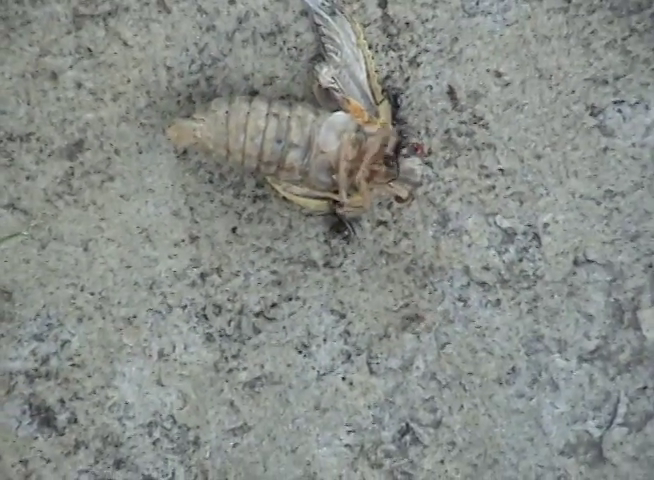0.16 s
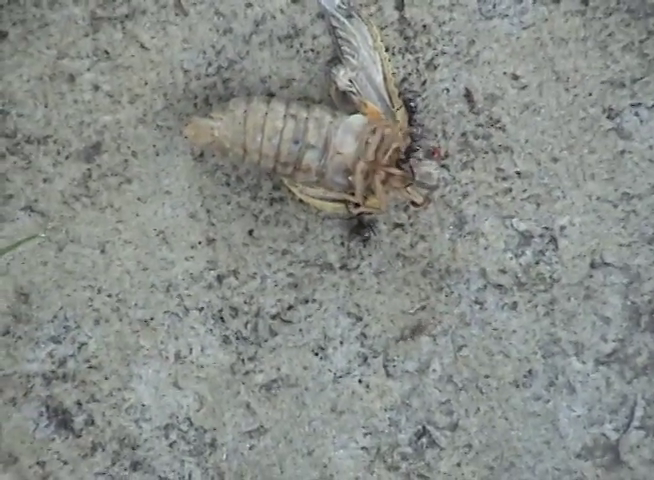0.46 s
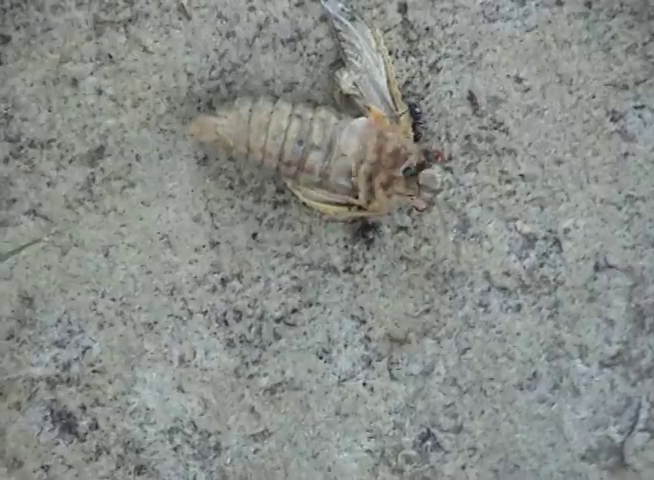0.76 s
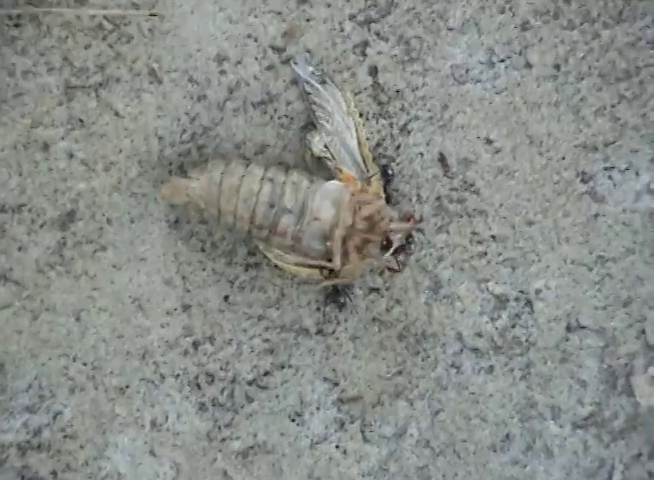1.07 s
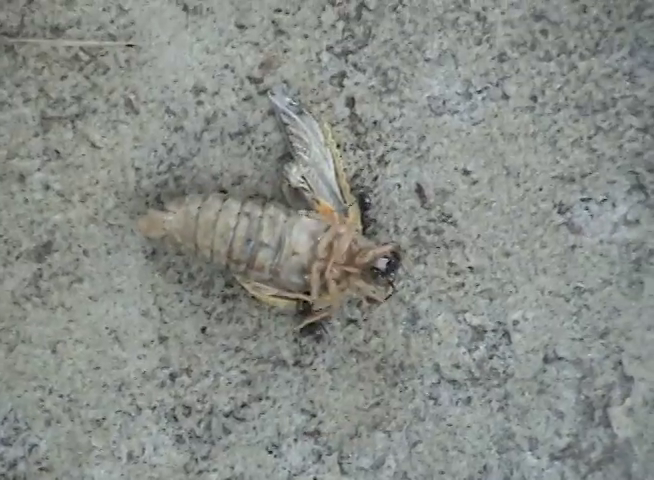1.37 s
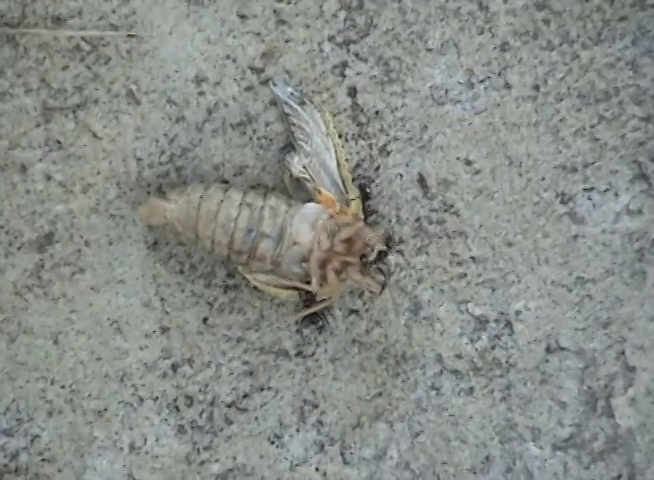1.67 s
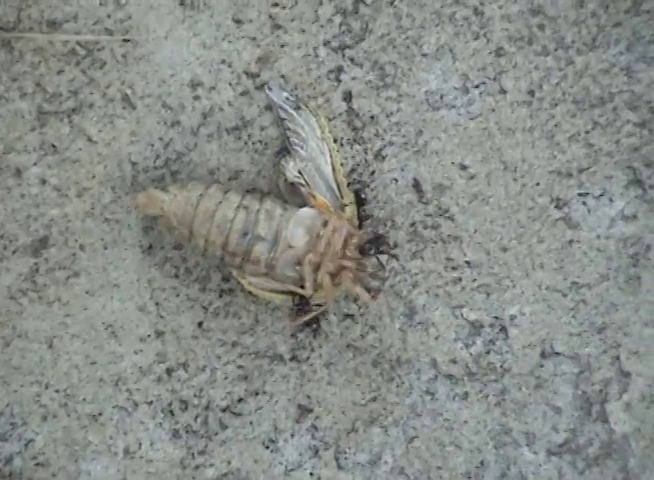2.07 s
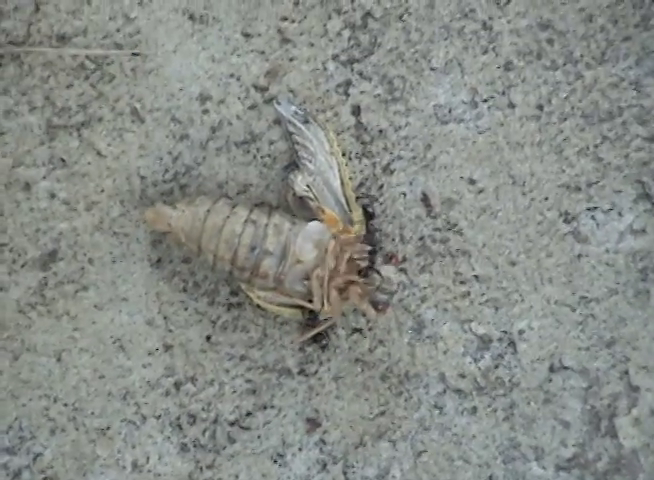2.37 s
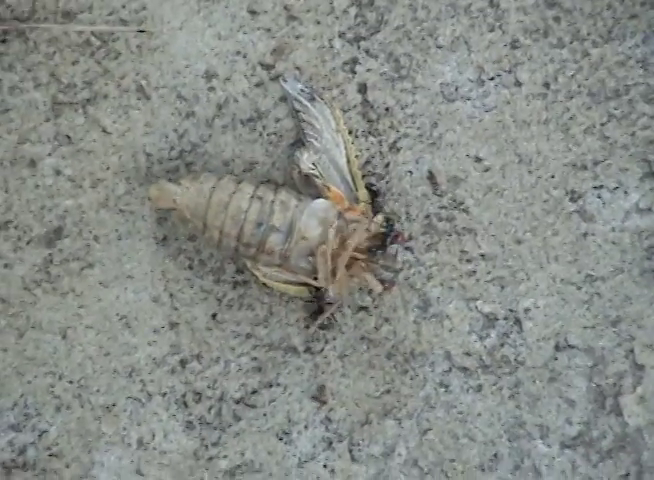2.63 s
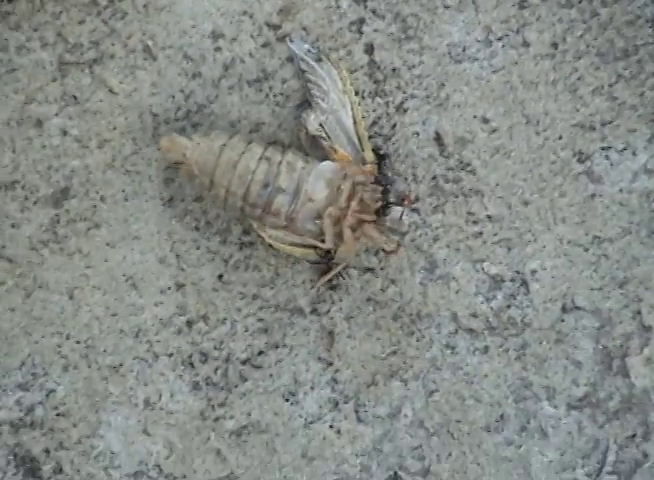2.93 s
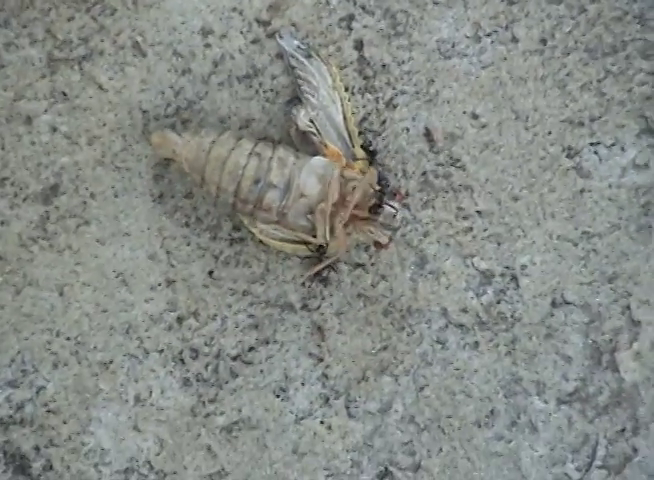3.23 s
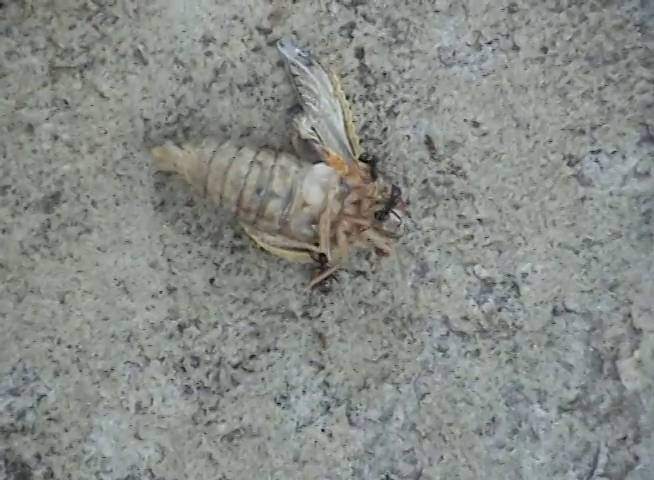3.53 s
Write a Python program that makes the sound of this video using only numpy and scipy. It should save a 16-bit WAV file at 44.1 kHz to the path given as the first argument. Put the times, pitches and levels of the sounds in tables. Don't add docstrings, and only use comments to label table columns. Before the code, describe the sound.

A dense cicada chorus drones throughout, a slightly rough, whistling mid-pitched hum, strongest around 0.3-1 seconds, with a fainter, quickly throbbing high buzz. Low distant traffic, a soft fan hum, faint hiss and a barely audible electronic whine lie behind. Close dull finger knocks cluster from 0.2 to 1.4 seconds, returning near 2.05 and 2.75; small sharp ticks accompany some, with others near 3.25 and 3.45.

```python
import sys
import numpy as np
from scipy import signal
from scipy.fft import rfft, irfft
from scipy.io import wavfile

SR = 44100
rng = np.random.default_rng(int(sys.argv[2]) if len(sys.argv) > 2 else 0)


def volts_from_db(level):
    exponent = np.asarray(level, float) / 20
    return 10 ** exponent


def materialize(psi):
    bounded = np.clip(np.atleast_2d(psi).T, -1, 1)
    quanta = np.round(bounded * 32767).astype(np.int16)
    wavfile.write(sys.argv[1], SR, quanta)


N = 163170
T = np.arange(N) / SR


def evened(x):
    return x / np.sqrt(np.mean(x ** 2) + 1e-20)


def read(points, hz):
    f, value = np.transpose(points)
    return np.interp(np.log(hz + 1), np.log(f + 1), value)


def swell(points):
    return np.interp(T, *np.transpose(points))


def slow(top_hz):
    waves = 0
    for f in np.geomspace(top_hz / 3, top_hz, num=16):
        waves = waves + np.sin(2 * np.pi * (f * T + rng.random())) / np.sqrt(f)
    return evened(waves)


def resonate(x, hz, width):
    turn = np.exp(2j * np.pi * np.cumsum(hz * np.ones(N)) / SR)
    r = np.exp(-np.pi * width / SR)
    smooth = signal.lfilter([(1 - r) ** 2], [1, -2 * r, r * r], x / turn)
    return 2 * (turn * smooth).real


def clicks(per_s, uneven_db):
    hit = rng.random((2, N)) < per_s / SR
    sign = rng.choice([-1., 1.], (2, N))
    size_db = uneven_db * np.minimum(rng.exponential(1, (2, N)), 4)
    return hit * sign * volts_from_db(size_db)


def drone():
    # time in seconds, effort in dB.
    effort = [(0, -30.5), (.3, -26.5), (.6, -26), (1.1, -27.5), (1.5, -28), (2.25, -30), (2.9, -29.5),
              (3.27, -28.5), (3.7, -30.5)]
    # pitch in Hz, width in Hz, level in dB.
    air_sacs = [(1320.6, 114, 0), (1260, 147, -7.5), (1161, 124, -10.5), (1462, 177, -12.5)]
    clicks_per_s, uneven_db, wander_hz = 6000, 3., 3.2
    crowd = 0
    for hz, width, db in air_sacs:
        struck = clicks(clicks_per_s, uneven_db)
        crowd = crowd + volts_from_db(db) * evened(resonate(struck, hz + wander_hz * slow(8.), width))
    return volts_from_db(swell(effort)) * evened(crowd)


def buzz():
    # time in seconds, effort in dB.
    effort = [(0, -47.5), (.2, -51), (.62, -49.5), (.7, -49.5), (1.0, -50.5), (1.4, -49.5), (1.47, -50.5),
              (1.8, -49.5), (1.99, -51.5), (2.1, -48), (2.28, -52), (2.44, -49), (2.63, -52), (2.75, -49),
              (2.95, -51.5), (3.18, -49), (3.7, -50.5)]
    # pitch in Hz, width in Hz, level in dB, share of the swell (0 to 1).
    air_sacs = [(8054, 1960, 0.5, 1), (7000, 1870, -2.5, 0.67), (5710, 1350, -1.5, 0.2),
                (4690, 1240, -7.5, .1), (3975, 660, -7.5, 0.088)]
    clicks_per_s, uneven_db = 15000, 2.5
    throb_db, throb_hz = .9, 20
    effort_db = swell(effort)
    mean_db = effort_db.mean()
    move_db = effort_db - mean_db + throb_db * slow(throb_hz)
    crowd = 0
    for hz, width, db, share in air_sacs:
        rung = evened(resonate(clicks(clicks_per_s, uneven_db), hz, width))
        crowd = crowd + volts_from_db(mean_db + db + share * move_db) * rung
    return crowd


def ring(start, hz, t60, rise, pan_db, lag):
    t = np.maximum(T - start, 0)
    shape = (1 - np.exp(-t / rise)) * volts_from_db(-60 * t / t60)
    side = np.array([[1.], [-1.]]) / 2
    tone = np.sin(2 * np.pi * hz * t + side * lag)
    return volts_from_db(side * pan_db) * shape / shape.max() * tone


def knocks():
    # start in seconds, peak in dB, pitch in Hz, left-right difference in dB, right lag in rad.
    blows = [(.221, -31, 400, 0, 1.6), (.364, -34, 480, 0, 2.2), (.426, -34, 520, -2, 2.),
             (.485, -31.5, 590, 1.5, 2.2), (.527, -29.5, 560, -2, 2.2), (.587, -21.5, 620, 1.5, 1.2),
             (.659, -23, 600, -4, 1.), (.731, -34, 700, -1, 2.), (.948, -28, 590, -5, 1.2),
             (1.155, -25.5, 600, -1, 1.2), (1.176, -22, 660, 2, 1.7), (1.219, -30, 680, .6, 1.5),
             (1.299, -34, 620, -2, 1), (1.404, -33, 640, -2, 1.7), (2.016, -34, 680, 4, 2.),
             (2.072, -20, 630, -5, 1.1), (2.757, -25.5, 640, 0, 1.2)]
    # pitch ratio, level in dB, delay in seconds, lag factor.
    parts = [
        (1.014, 0.5, 0.0016, 1.),
        (.7, -6, .0012, 1.3),
        (.87, -12, .0062, 1.8),
    ]
    rise_s, t60_s = .001, .013
    out = np.zeros((2, N))
    for start, db, hz, pan_db, lag in blows:
        for ratio, own_db, late, lag_factor in parts:
            mode = ring(start + late, hz * ratio, t60_s, rise_s, pan_db, lag * lag_factor)
            out += volts_from_db(db + own_db) * mode
    return out


def ticks():
    # start in seconds, peak in dB, left-right difference in dB, mid modes in dB, top modes in dB.
    taps = [(.5868, -39, 5, 0, -13), (1.155, -43, 8, 5.5, -3), (1.1755, -27, 4, -9, -22),
            (2.016, -29.5, 12, -7, -21), (2.0722, -38, -3, -4, -5), (2.7547, -24, -6, -9, -30),
            (3.24, -35, -8, -14, -30), (3.4729, -48, -1.0, 0, -7)]
    # pitch in Hz, t60 in seconds, group (0 low, 1 mid, 2 top), level in dB.
    modes = [(2290, 0.0047, 0, -8.5), (2755, 0.0023, 0, 0), (4550, 0.0047, 1, 0), (7600, 0.0023, 1, -1),
             (11700, .004, 2, -3), (13700, 0.0025, 2, -5)]
    rise_s, late_s, low_lag_rad = 0.0012, 0.00139, 0.82
    out = np.zeros((2, N))
    for start, db, pan_db, mid_db, top_db in taps:
        for hz, t60, group, own_db in modes:
            group_db = (0, mid_db, top_db)[round(group)]
            lag = low_lag_rad * (group < .5)
            out += volts_from_db(db + own_db + group_db) * ring(start + late_s, hz, t60, rise_s, pan_db, lag)
    return out


def traffic():
    # frequency in Hz, level in dB per Hz.
    wash = [(25, -12.5), (60, -2.5), (130, 0), (330, -6), (650, -12), (900, -4.5), (2300, -18.5),
            (3200, -17), ]
    hz = np.fft.rfftfreq(N, 1 / SR)
    far = 1 / (1 + (hz / 5000) ** 4)
    noise = rfft(rng.standard_normal((2, N)))
    return volts_from_db(-40.5) * evened(irfft(noise * volts_from_db(read(wash, hz)) * far, N))


def hiss():
    return volts_from_db(-71.5) * evened(resonate(rng.standard_normal((2, N)), 10300, 6000.))


def fan():
    # pitch in Hz, level in dB, width in Hz.
    hums = [(120, -52, 9.5), (241.3, -57, 2.35), (363, -63, 4.8)]
    return sum(volts_from_db(db) * evened(resonate(rng.standard_normal((2, N)), hz, width)) for hz, db, width in hums)


def whine():
    # pitch in Hz, level in dB.
    tones = [(9443, -82), (11390, -91), (11688, -89), (12138, -92), (12288, -89), (12969, -93),
             (13269, -93), (13718, -92), (13867, -95), (14168, -95)]
    return sum(volts_from_db(db) * np.sqrt(2) * np.sin(2 * np.pi * (hz * T + rng.random())) for hz, db in tones)


def ports(pair):
    # frequency in Hz, left-right likeness (0 to 1).
    likeness = [(25, 0.83), (100, 1), (330, 0.78), (450, 0.43), (1300, 0.65), (3000, 0.37), (7500, 0.86),
                (12500, 0.67)]
    # frequency in Hz, right lag in rad.
    right_lag = [(300, 0.), (1000, 0.003), (1400, 0.36), (2300, 0.52), (3600, 0.3), (6500, 0)]
    # frequency in Hz, left-right difference in dB.
    balance = [(200, 0), (800, 1), (1300, 0.6), (4300, -.9), (8000, -0.9), (14000, 0.)]
    hz = np.fft.rfftfreq(N, 1 / SR)
    a, b = rfft(pair)
    shared = np.clip(read(likeness, hz), -1, 1)
    tilt = volts_from_db(read(balance, hz) / 2)
    right = (shared * a + np.sqrt(1 - shared ** 2) * b) * np.exp(-1j * read(right_lag, hz))
    return irfft(np.array([a * tilt, right / tilt]), N)


def scene():
    # frequency in Hz, gain in dB.
    mic = [(2600, 0.5), (3200, -4), (3800, -0.5), (9000, -.5), (11000, -1), (14000, -6), (16000, -8)]
    air = drone() + buzz() + traffic() + hiss() + fan()
    coloured = irfft(rfft(air) * volts_from_db(read(mic, np.fft.rfftfreq(N, 1 / SR))), N)
    return ports(coloured) + knocks() + ticks() + whine()


def top_cut(x):
    return signal.sosfilt(signal.butter(12, 15210, fs=SR, output="sos"), x)


def record(dry):
    lowpass = signal.firwin(301, 14480, window=("kaiser", 7), fs=SR)
    limited = signal.oaconvolve(dry, lowpass[None], "same")
    return top_cut(limited)


dry = scene()
out = record(dry)
materialize(out)
```